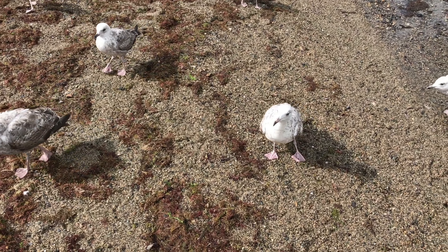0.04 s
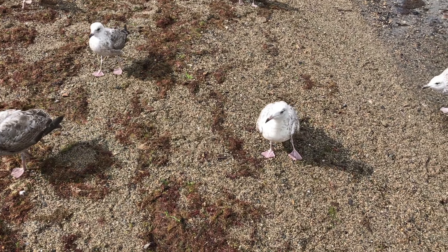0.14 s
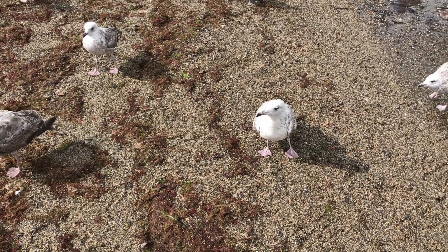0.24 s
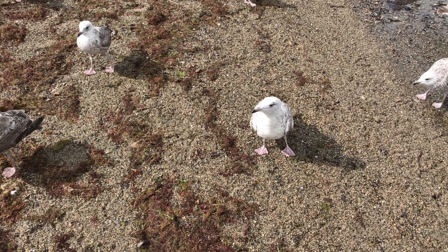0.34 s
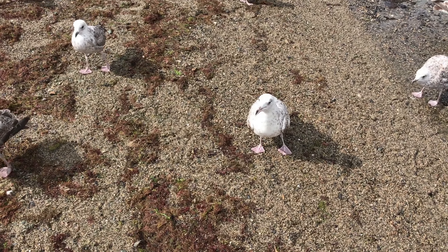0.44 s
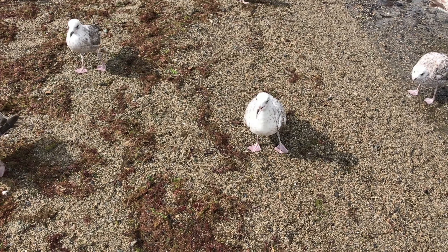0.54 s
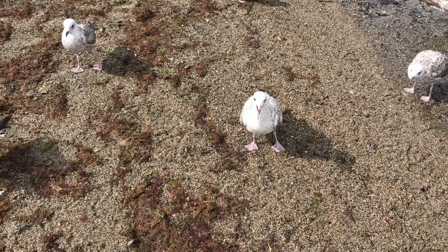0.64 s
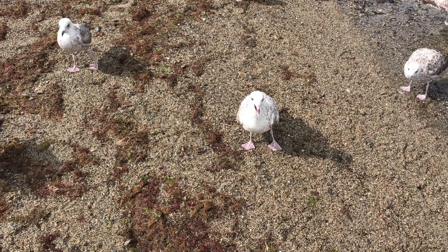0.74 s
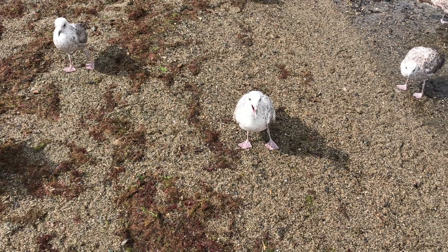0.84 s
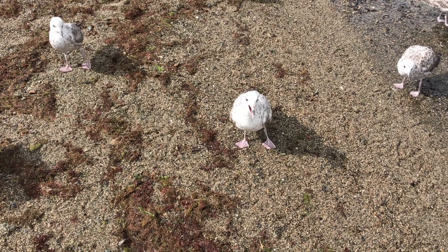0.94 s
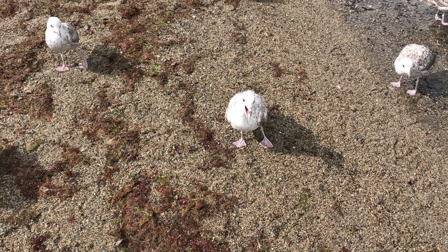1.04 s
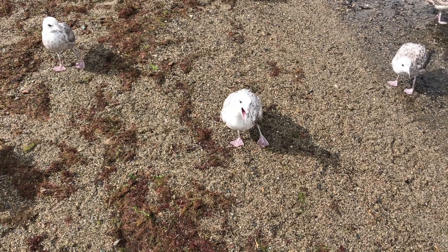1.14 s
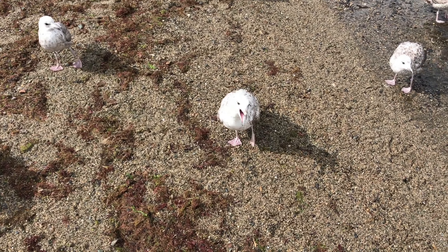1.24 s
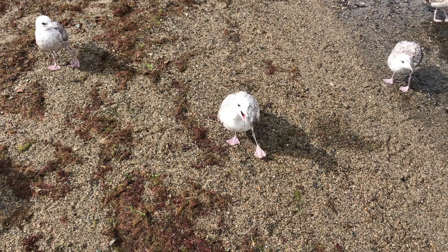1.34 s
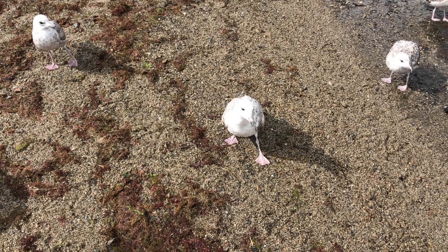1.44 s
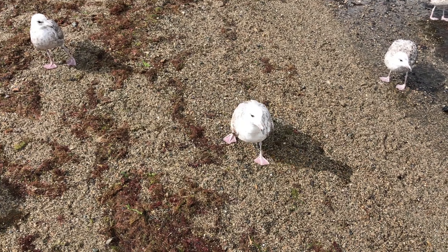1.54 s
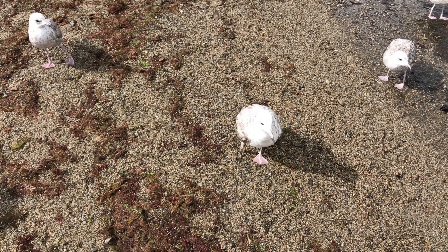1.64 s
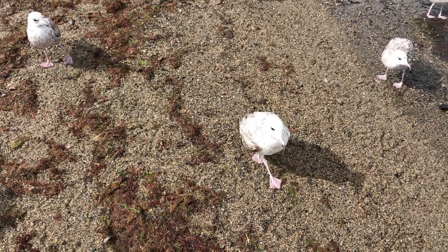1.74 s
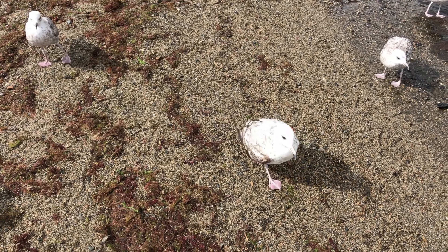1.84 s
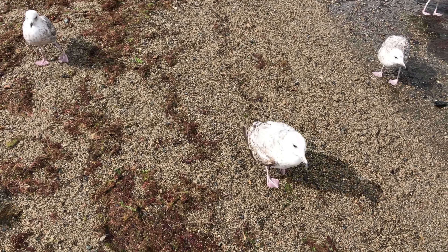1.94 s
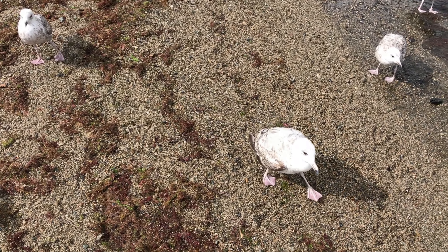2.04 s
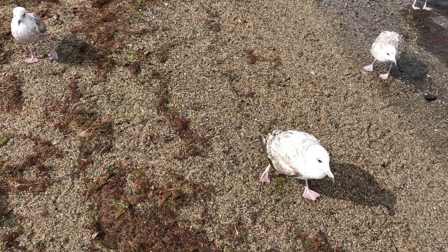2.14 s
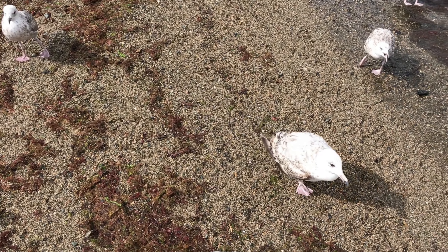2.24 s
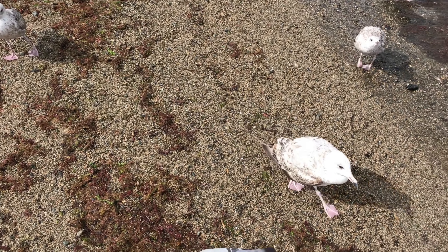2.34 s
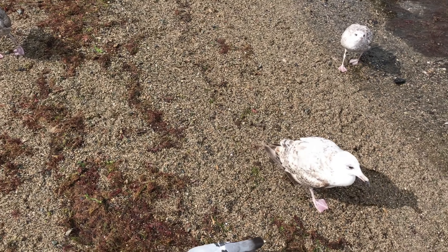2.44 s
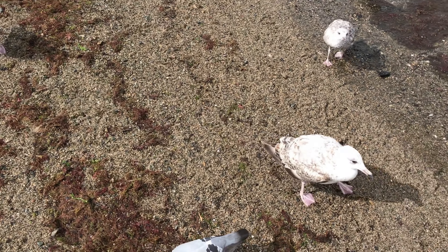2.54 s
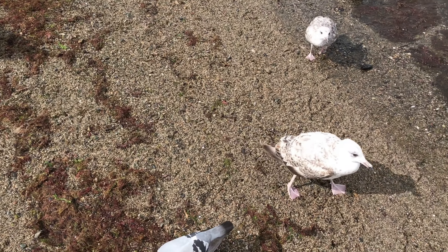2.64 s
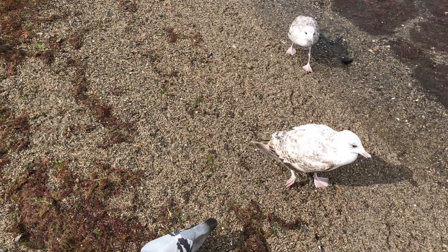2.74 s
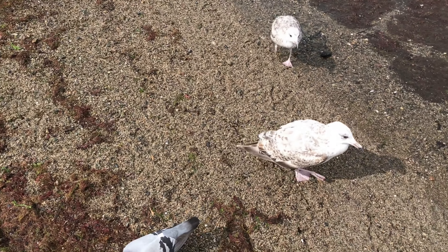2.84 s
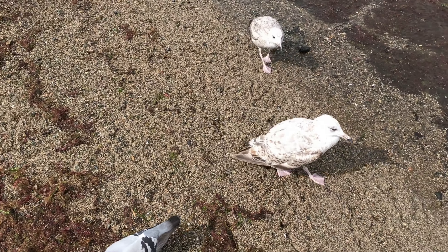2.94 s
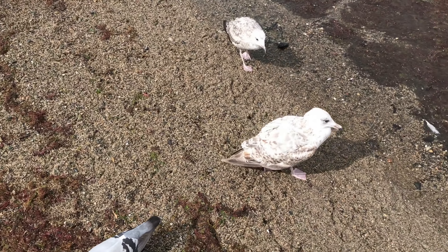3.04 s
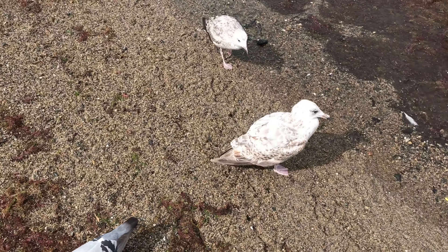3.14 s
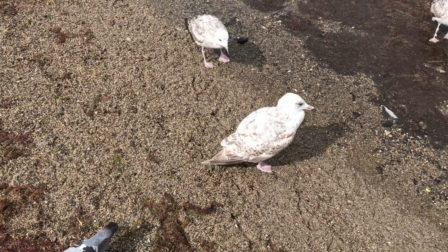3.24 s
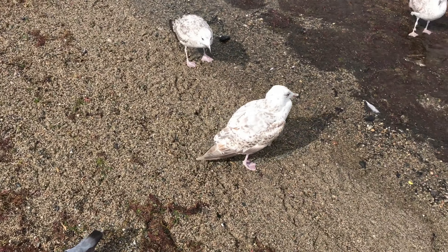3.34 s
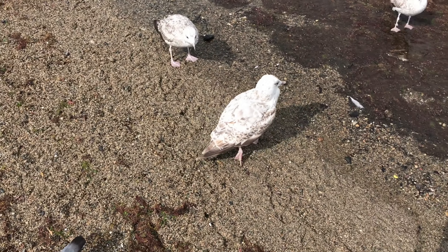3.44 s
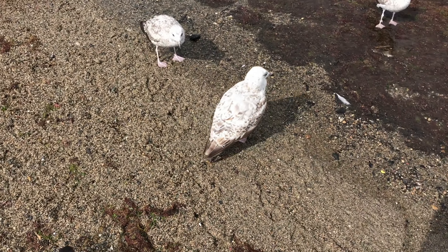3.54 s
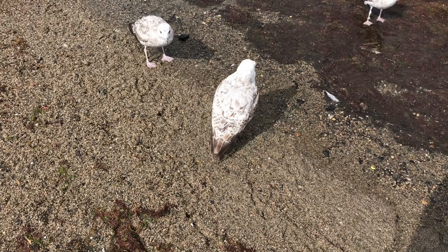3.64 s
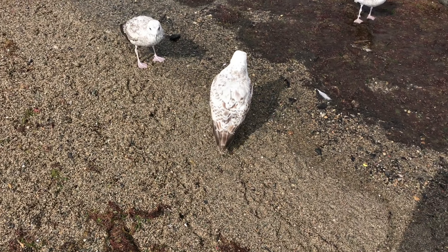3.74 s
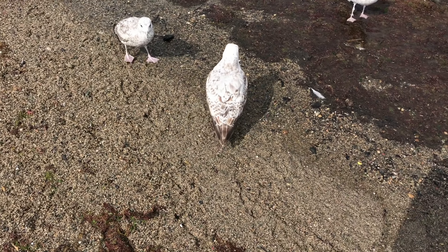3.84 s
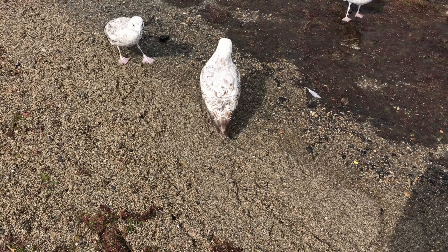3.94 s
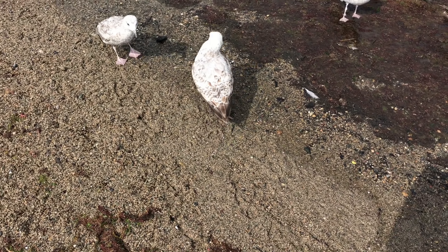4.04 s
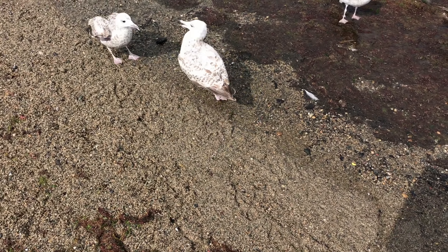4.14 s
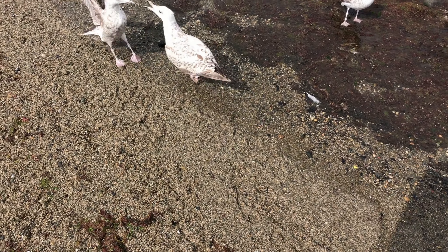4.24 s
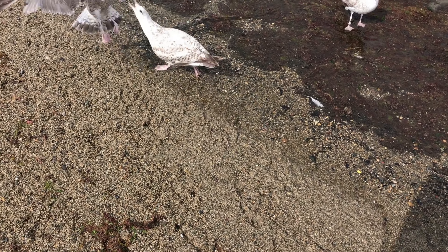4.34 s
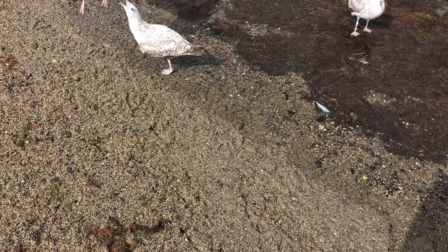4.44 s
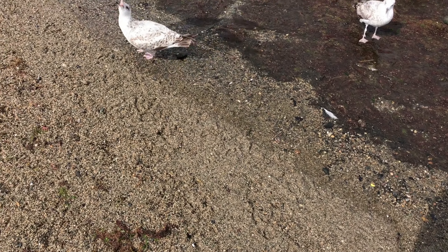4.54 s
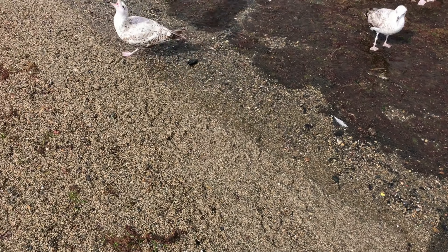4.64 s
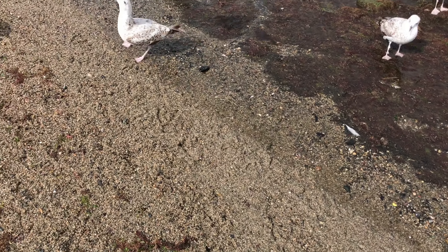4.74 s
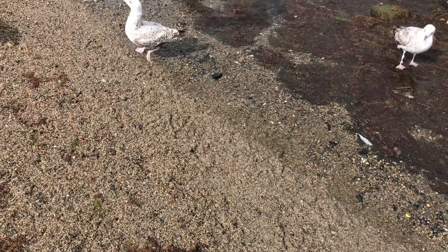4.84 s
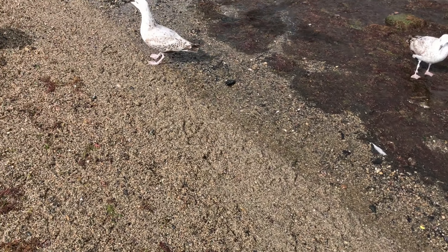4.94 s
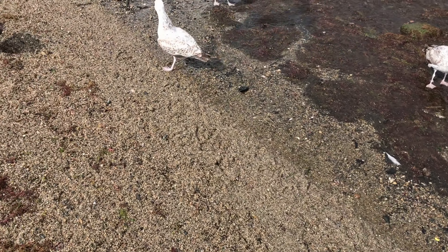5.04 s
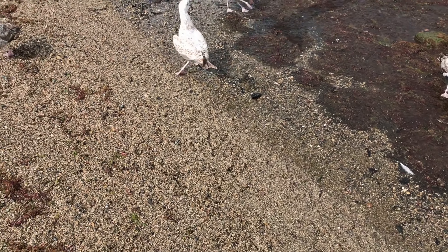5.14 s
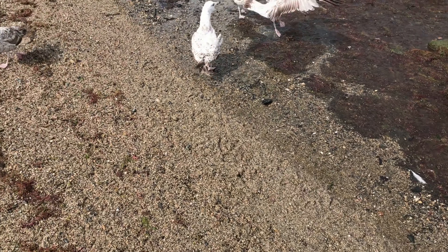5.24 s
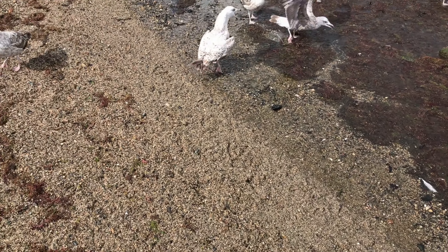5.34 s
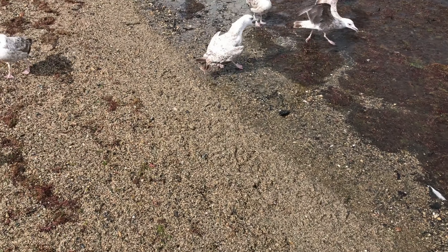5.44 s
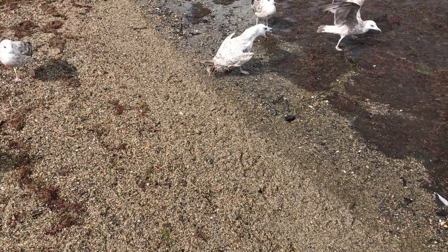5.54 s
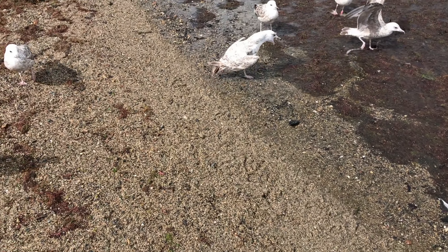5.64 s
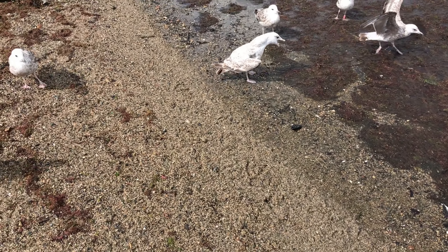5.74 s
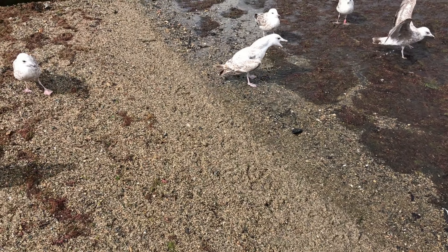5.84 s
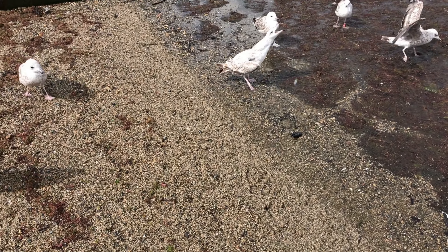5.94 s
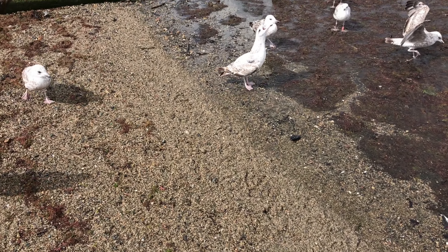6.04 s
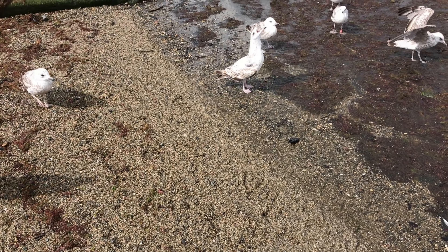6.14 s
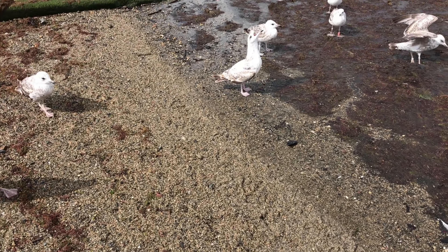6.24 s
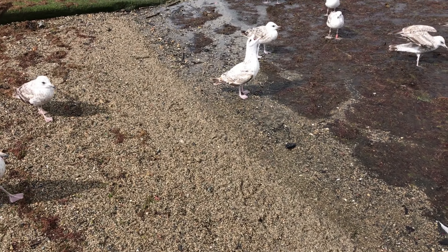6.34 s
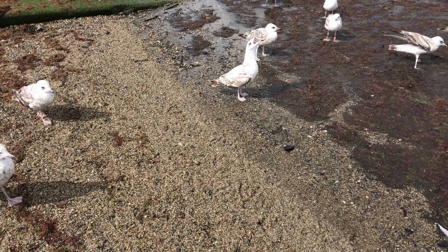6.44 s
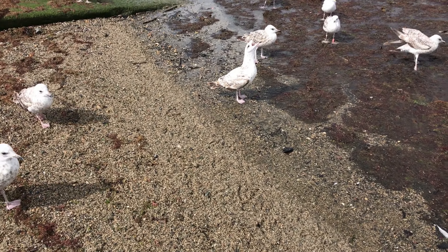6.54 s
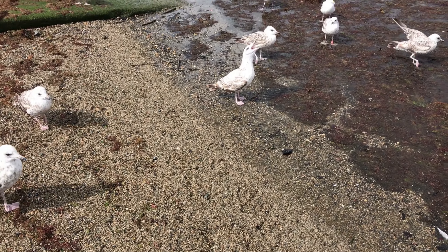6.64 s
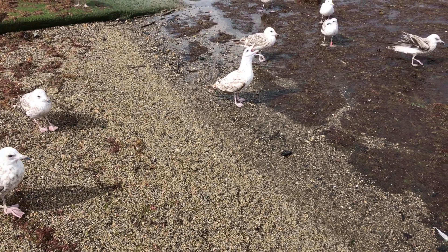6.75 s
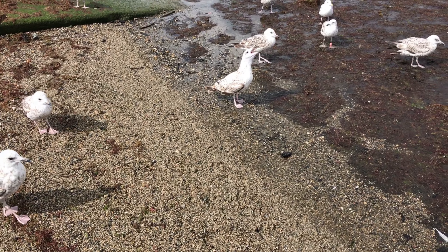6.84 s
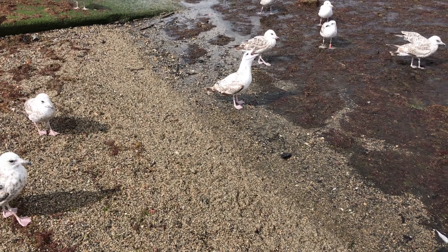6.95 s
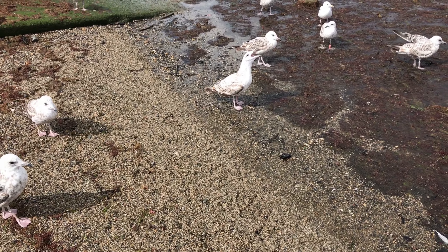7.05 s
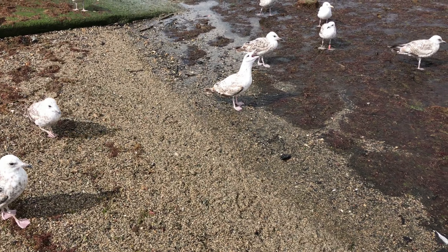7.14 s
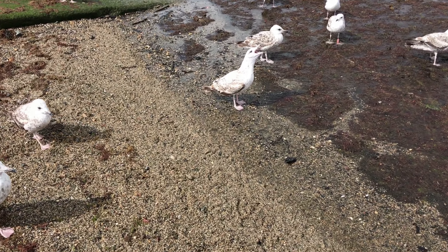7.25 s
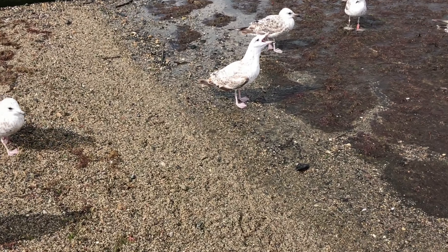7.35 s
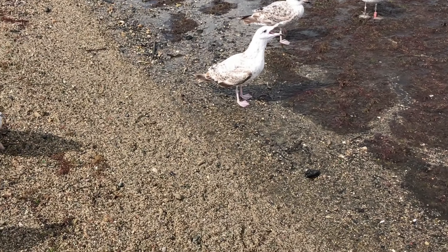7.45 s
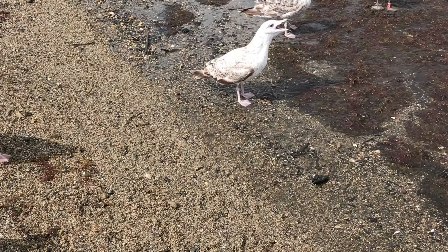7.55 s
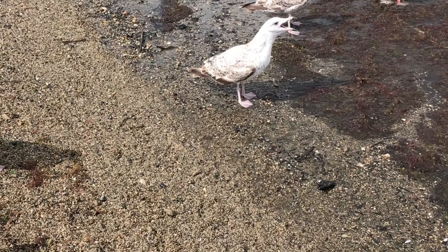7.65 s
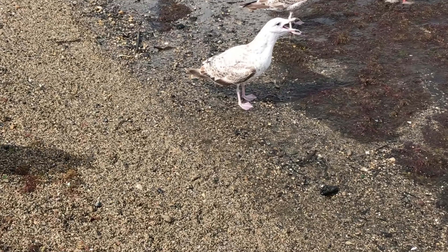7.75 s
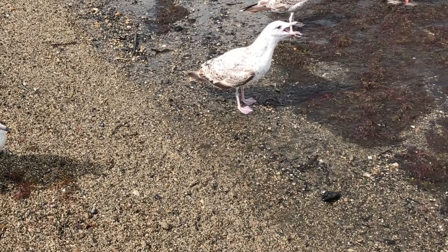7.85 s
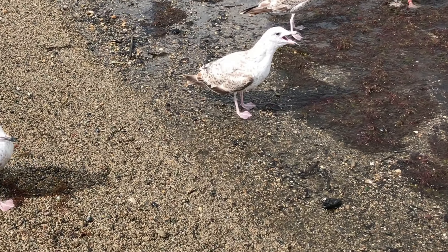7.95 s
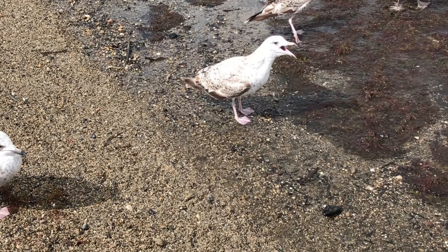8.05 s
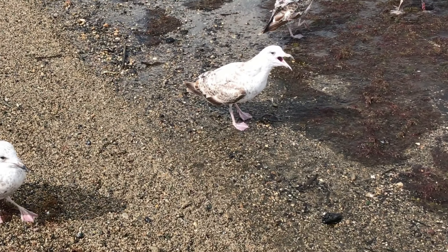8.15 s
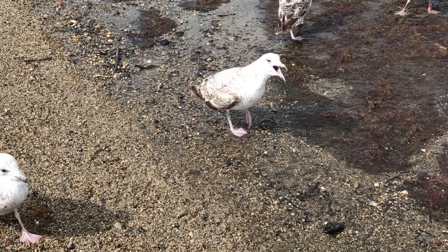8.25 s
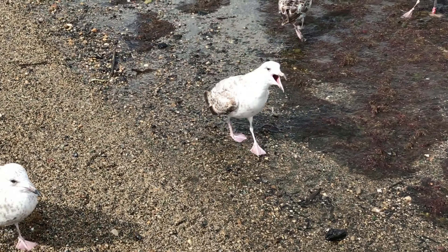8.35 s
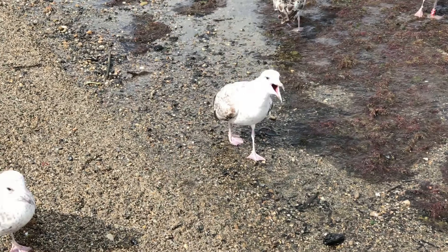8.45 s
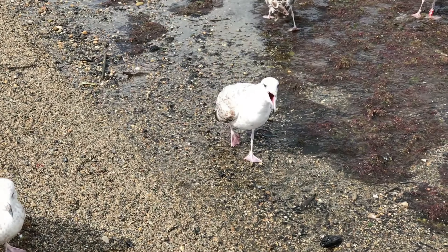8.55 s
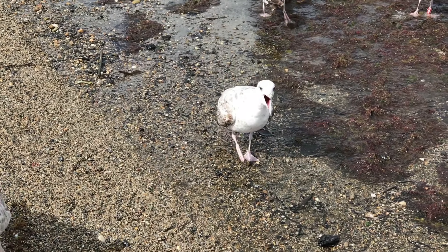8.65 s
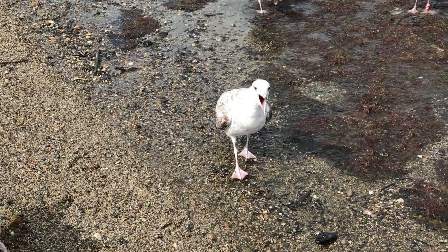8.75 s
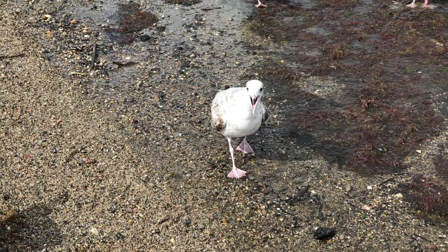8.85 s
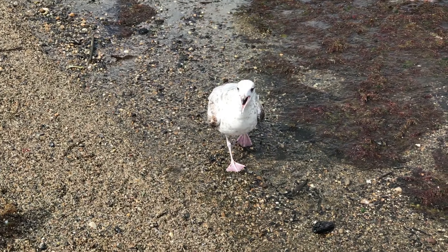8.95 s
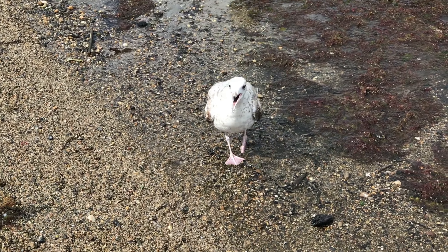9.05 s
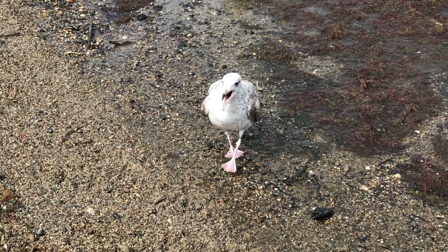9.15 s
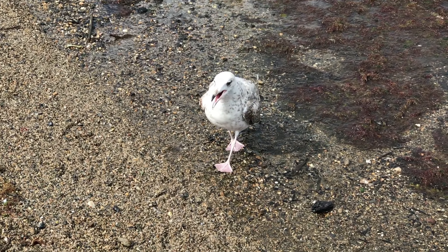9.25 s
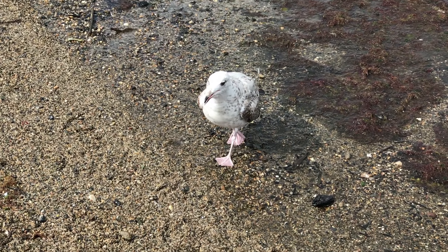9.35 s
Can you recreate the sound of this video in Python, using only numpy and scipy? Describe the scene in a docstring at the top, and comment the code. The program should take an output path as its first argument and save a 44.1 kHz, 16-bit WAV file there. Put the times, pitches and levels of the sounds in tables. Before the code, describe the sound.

Outdoors on a gravel shore, young gulls beg close by. A soft, thin wail swells into a fuller note, then shrill, wavering squeals come in two bouts with a gap between. Broken squawks and chirps lead into a regular run of sharp, two-part yelps, each snapping high and dropping hoarsely. Short rattling growls come between. Light wind bumps the microphone over faint uneven shore hiss.

```python
"""Young gulls begging on a gravel shore

A wail, two squeals, then a run of yelps built alike, with low growls between. The voices jump between registers:
thin whistles are nearly pure tones, squawks are stacks of overtones that break into half pitch,
croaks add chopped breath noise, squeals are combs of lines from two oscillations, and growls are rattled combs.
A light breeze buffets the microphone as lumpy low noise; the shore hisses unevenly and returns a faint echo."""
import sys
import numpy as np
from scipy import signal
from scipy.fft import rfft, irfft, next_fast_len
from scipy.io import wavfile
from scipy.ndimage import map_coordinates

SR = 44100
rng = np.random.default_rng(int(sys.argv[2]) if len(sys.argv) > 2 else 0)


def to_wav(sig):
    """Store sig (one row per channel, or 1-D mono) as 16-bit WAV at the path in sys.argv[1].

    Samples outside -1..1 are clipped; the rate is SR.
    """
    pcm = np.clip(np.atleast_2d(sig), -1, 1) * 32767
    pcm = np.round(pcm).astype(np.int16)
    wavfile.write(sys.argv[1], SR, pcm.T)  # frames by channels


N = 414099  # length in samples
TOP_HZ = 15830  # nothing sounds above this
MULTIPLES = np.arange(1, 15)  # partial numbers of a voice


def amp(db):
    """Gain of a level in dB."""
    return 10 ** (np.asarray(db) / 20)


def unit(x):
    """Scaled to rms 1."""
    return x / np.sqrt(np.mean(x ** 2) + 1e-20)


def along(points, hz):
    """(frequency [Hz], value) points read on a log frequency axis."""
    f, v = np.transpose(points)
    return np.interp(np.log(hz + 1), np.log(f + 1), v)


def wobble(rate):
    """A smooth random curve with `rate` knots a second."""
    knots = rng.standard_normal(int(N * rate / SR) + 2)
    fine = np.arange(len(knots) * 8) / 8  # eight curve points per knot
    curve = map_coordinates(knots, [fine])
    return np.interp(np.arange(N) * rate / SR, fine, curve)


def beak(rate, count=len(MULTIPLES)):
    """One random level curve for each partial, as a moving beak would give."""
    return np.array([wobble(rate) for _ in range(count)])


def filtered(x, response):
    """x with each frequency scaled by response(hz)."""
    size = next_fast_len(len(x) + 8192)
    spectrum = rfft(x, size) * response(np.fft.rfftfreq(size, 1 / SR))
    return irfft(spectrum, size)[:len(x)]


def noise(spectrum):
    """Coloured noise of rms 1."""
    return unit(filtered(rng.standard_normal(N), lambda hz: amp(along(spectrum, hz))))


def sing(notes, timbre, attack, release, waver):
    """Glides from first to last pitch; the membrane keeps its phase from note to note, so joined notes flow."""
    out, cycles, was = np.zeros(N), 0, 0
    tremor = waver * (wobble(40) + wobble(200))
    for start, end, hz0, hz1, db, *rest in sorted(notes):
        rise, fall = np.minimum([attack, release], (end - start) * 0.28)  # short notes are all swell and fade
        at = np.arange(round((start - rise) * SR), round((end + fall) * SR))
        t = at / SR
        hz = np.interp(t, [start, end], [hz0, hz1]) * (1 + tremor[at])
        phase = cycles + hz0 * (start - rise - was) + np.cumsum(hz) / SR
        cycles, was = phase[-1], t[-1]
        swell = np.minimum((t - start + rise) / (2 * rise), (end + fall - t) / (2 * fall))
        envelope = np.sin(np.clip(swell, 0, 1) * np.pi / 2) ** 2
        out[at] += amp(db) * envelope * timbre(at, hz, 2 * np.pi * phase, *rest)
    return out


# resonances of the throat: (frequency [Hz], relative level [dB])
THROAT_COLOUR = [(600, -34), (1000, 5), (1200, 9.5), (1900, -3.5), (3100, 8.5), (4200, -5), (5000, -14.5),
                 (6400, -15), (9000, -26), (15000, -35)]


def stack(at, hz, phase, multiples, beak_db, throat=THROAT_COLOUR):
    """Partials weighted by the throat at their frequency; the moving beak swells each in its own way."""
    partial_hz = np.minimum(multiples[:, None] * hz, SR / 2)
    gain = amp(along(throat, partial_hz)) * (partial_hz < TOP_HZ)
    waves = np.sin(multiples[:, None] * phase + multiples[:, None] ** 2)  # staggered, so the cycles are not spikes
    loudness = np.sqrt(np.mean(np.sum(gain ** 2, axis=0)) / 2)
    return np.sum(gain * amp(beak_db) * waves, axis=0) / loudness


def rasp():
    """Breath noise in the throat resonances."""
    return noise(THROAT_COLOUR)


# breeze and hiss: (time [s], breeze level [dB], hiss level before a shared 12 dB boost [dB])
AIR_LEVELS = [(.2, -51.5, -68.5), (.9, -46, -63.5), (1.8, -53.5, -67.5), (2.9, -53.5, -65.5),
              (3.401, -48, -67), (4.199, -50, -63.5), (4.999, -58, -62.5), (5.5, -46.5, -60.5),
              (6, -51, -66), (7.4, -59, -66), (8.8, -52, -66)]
# colour of the wind buffeting: (frequency [Hz], relative level per Hz [dB])
BREEZE_COLOUR = [(20, -13), (52, 4.5), (300, -7), (700, -33.5), (16000, -78.5)]
# colour of the shore hiss: (frequency [Hz], relative level per Hz [dB])
SHORE_COLOUR = [(300, 25.5), (1300, 19.5), (3000, 10), (8000, -1.5), (16000, -3.5)]


def air():
    """Low noise buffets in lumps; the hiss adds steady noise to short, bright, flickering bursts."""
    s, breeze_db, hiss_db = np.transpose(AIR_LEVELS)
    t = np.arange(N) / SR
    lumpy = unit(noise(BREEZE_COLOUR) * amp(5.4 * wobble(13)))
    breeze = amp(np.interp(t, s, breeze_db)) * lumpy
    flicker = amp(5 * wobble(40))
    bright = filtered(noise(SHORE_COLOUR), lambda hz: hz / (hz + 4000))
    hiss = 0.53 * noise(SHORE_COLOUR) + 1.39 * flicker * bright
    return breeze + amp(np.interp(t, s, hiss_db) + 12.0) * hiss


# colour of a growl: (frequency [Hz], relative level before the growl's sharpness scales it [dB])
GULLET_COLOUR = [(500, -22), (950, -3), (1700, -13), (2300, -3), (3000, 5), (3700, -5), (4700, -9),
                 (12000, -30)]
# low growls: (start [s], end [s], first pitch [Hz], last pitch [Hz], level [dB],
# level of odd partials [dB], sharpness of the gullet [factor])
GROWL_NOTES = [(.425, .472, 342.4, 329, -41, 0, 1.6), (.99, 1.16, 294.2, 287.6, -34, -11, 1.1),
               (5.36, 5.55, 313, 292.6, -40.5, -5.5, 0.94), (6.13, 6.225, 312.2, 324, -39, -5, 0.83),
               (7.58, 7.67, 310, 280, -42, -3, .7), (9.255, 9.3, 355, 340, -33, -7, 1.1)]


def growls():
    """A dense comb of partials, odd ones often weaker, beaten by an uneven membrane rattle over a little breath."""
    multiples = np.arange(1, 31)
    flare_db = 4.5 * beak(45, count=30)
    breath, jitter = noise(GULLET_COLOUR), .03 * wobble(400)
    rattle_hz = 165 + 45 * wobble(40)
    rattle = 1 + .55 * np.cos(2 * np.pi * np.cumsum(rattle_hz) / SR)

    def timbre(at, hz, phase, odd_db, sharpness):
        beak_db = flare_db[:, at] + odd_db * (multiples[:, None] % 2)
        gullet = [(f, sharpness * db) for f, db in GULLET_COLOUR]
        comb = stack(at, hz, phase + jitter[at], multiples, beak_db, gullet)
        return (comb + amp(-20) * breath[at]) * rattle[at]
    return sing(GROWL_NOTES, timbre, attack=.016, release=.006, waver=.005)


def shore_echo(x):
    """Open ground returns a faint, short, scattered echo."""
    t = np.arange(SR // 2) / SR
    tail = rng.standard_normal(len(t)) * amp(-60 * t / 0.18)  # dies by 60 dB in 0.18 s
    return amp(-22.5) * signal.fftconvolve(x, tail / np.linalg.norm(tail))[:N]


# single full-voiced notes: (start [s], end [s], first pitch [Hz], last pitch [Hz], level [dB],
# half-pitch level [dB], rasp level [dB], lift of the second partial, if any [dB])
SQUAWK_NOTES = [(0.49, 0.8, 1673, 1746, -46, -14, -28, 8), (0.8, 0.99, 1745, 1819, -43, -16, -20, 8),
                (1.16, 1.28, 1070, 1096, -32, -25, -48), (1.28, 1.475, 1078, 1015, -30, -21, -25),
                (4.875, 5.1, 1353, 1320, -46.5, 2, -10.5), (5.195, 5.237, 2050, 1943, -28, -33, -18),
                (6.2, 6.34, 1525, 1415, -41, 1.5, -3), (7.01, 7.06, 2205, 1900, -35.5, -10, -9.5),
                (5.692, 5.74, 2030, 1850, -30, -20, -9)]


def squawks(notes):
    """Harmonic stack; alternating cycles add partials halfway; breath rasps, shakes and breaks the partials."""
    breath = unit(rasp() * amp(3 * wobble(200)))
    whole_beak, halves_beak, ragged = beak(35), beak(45), beak(120)
    shake = .15 * wobble(500)

    def timbre(at, hz, phase, half_db, rasp_db, bright_db=0):
        loose = min(1, .09 * SR / len(at))  # long notes are held steadier
        tearing = amp(rasp_db) * np.linspace(.4, 1.6, len(at))  # the voice tears more as the note runs out
        from_edge = np.minimum(at - at[0], 2 * (at[-1] - at))
        settled = np.clip(from_edge / (0.028 * SR), 0, 1) ** 3  # the alternation sets in late and dies early
        phase = phase + (.25 * loose + tearing) * shake[at]
        break_depth_db = np.minimum(12 * tearing + loose * MULTIPLES[:, None], 6)
        broken_db = -break_depth_db * ragged[:, at] ** 2 + bright_db * (MULTIPLES[:, None] == 2)
        whole = stack(at, hz, phase, MULTIPLES, 3 * loose * whole_beak[:, at] + broken_db)
        halves = stack(at, hz, phase, MULTIPLES - .5, 4.5 * halves_beak[:, at] + broken_db)
        return whole + settled * amp(half_db) * halves + tearing * breath[at]
    return sing(notes, timbre, attack=0.0062, release=0.0079, waver=0.0036)


# single thin, nearly pure notes: (start [s], end [s], first pitch [Hz], last pitch [Hz], level [dB])
WHISTLE_NOTES = [(0.995, 1.16, 1060, 1085, -41.5), (5.22, 5.245, 2493, 2610, -33.5),
                 (5.28, 5.296, 2640, 2800, -39.5), (5.316, 5.355, 2680, 2450, -39),
                 (5.4, 5.42, 1350, 1510, -30), (5.487, 5.523, 1380, 1412, -27),
                 (5.52, 5.605, 3630, 3680, -47.5), (5.686, 5.696, 3000, 2700, -29),
                 (6.2, 6.36, 1544, 1416, -33.5), (7.491, 7.522, 3100, 3234, -20.5)]


def whistles(notes):
    """A nearly sinusoidal membrane with a faint overtone; the higher it is forced, the hoarser it gets."""
    shake, flutter, overtone_db = wobble(1000), wobble(45), 4 * wobble(30)

    def timbre(at, hz, phase, fade_db=0):
        strain = np.clip((hz - 2800) / 1200, .08, 1)
        phase = phase + .28 * strain * shake[at]
        tone = np.sin(phase) + amp(-20.0 + overtone_db[at]) * np.sin(2 * phase)
        level_db = 2.2 * flutter[at] - np.linspace(0, fade_db, len(at))
        return np.sqrt(2) * tone * amp(level_db)
    return sing(notes, timbre, attack=.0045, release=0.0061, waver=0.00299)


# single hoarse notes: (start [s], end [s], first pitch [Hz], last pitch [Hz], level [dB])
CROAK_NOTES = [(1.475, 1.505, 1737, 1554, -45), (4.525, 4.55, 1243, 1560, -36),
               (4.835, 4.855, 1352.0, 1458, -36.5), (5.23, 5.25, 1082, 1102, -34.5),
               (5.432, 5.462, 3000, 2680, -30.5), (5.472, 5.525, 2900, 2800, -35.5)]


def croaks(notes):
    """An unsteady half-pitch stack and breath noise, both chopped by irregular closures of the membrane."""
    breath = rasp()
    # odd partials of the half pitch are weaker, and each higher partial loses a little more
    beak_db = 5 * beak(60) - 6 * (MULTIPLES[:, None] % 2) - .6 * MULTIPLES[:, None]
    jitter = .1 * wobble(500)
    closures = amp(2.5 * wobble(400) + 2 * wobble(40))

    def timbre(at, hz, phase):
        voice = stack(at, hz / 2, phase / 2 + jitter[at], MULTIPLES, beak_db[:, at])
        return (voice + amp(-10) * breath[at]) * closures[at]
    return sing(notes, timbre, attack=0.0009, release=0.0091, waver=0.011)


# each squeal as points to glide through: (time [s], lowest line [Hz], step between lines [Hz],
# loudest line [0-3, may lie between], level [dB])
SQUEAL_PATHS = [
    [(2.25, 3060, 2960, 0.91, -31.5), (2.281, 2870, 2950, 0.6, -33)],
    [(2.281, 2950, 479, 2.1, -21.5), (2.305, 2890, 476, 1.97, -30), (2.318, 2940, 643, 1.13, -37.5),
     (2.345, 2980, 507, 2.2, -35), (2.365, 3230, 670, 2.9, -30), (2.39, 4060, 800, 2, -40),
     (2.582, 3630, 750, 1.76, -37.5), (2.592, 3500, 573, 1.85, -42), (2.65, 3346, 620, 2.1, -33),
     (2.748, 3280, 630, 1.76, -29), (2.762, 3290, 644, 1, -34.5), (2.828, 3240, 480, 0.052, -37.5),
     (2.85, 3170, 477, 0.42, -44)],
    [(4.535, 3560, 698, 1.14, -36.5), (4.56, 3560, 940, 0.74, -21.5), (4.6, 3076, 1160, 1.17, -38.5),
     (4.655, 3190, 874, 0.94, -35.5), (4.666, 3870, 900, 2, -39.5), (4.732, 3950, 795, 2, -43.5),
     (4.738, 3580, 758, 2, -36.5), (4.795, 3557, 667, 1, -33.5), (4.845, 3540, 724, 1, -28),
     (4.856, 3580, 752, 2.2, -34), (4.89, 3530, 724, 1.8, -41.5), (4.93, 3670, 740, 1.6, -27),
     (4.97, 3740, 686, 1.74, -40.5), (5, 3600, 686, 0.94, -34.5), (5.06, 3500, 604, 0.74, -39.5),
     (5.105, 3310, 616, 0.2, -22.5), (5.125, 3260, 621, 0.18, -49), (5.15, 3375, 329, 1, -37.5),
     (5.198, 3330, 636, 0.091, -24.5), (5.225, 3300, 710, 0.18, -41)],
]
ABOVE_DB, BELOW_DB = 30, 13  # loss for each line above the loudest; loss of the lowest line, more for those between
STRAIN_HZ, LEAP_HZ_PER_S = 5280, 40000  # above this the loudest line beats; a glide this fast tears


def squeals():
    """A high oscillation mixed with a slow one sounds as a comb of lines; the loudest wanders among them.
    Weak lines are hoarse and drop out, leaps tear the voice. Sums of two or three lines sound higher up."""
    out, overtones, lines = np.zeros(N), np.zeros(N), np.arange(4)[:, None]
    low_waver, step_waver = .004 * wobble(110), .015 * wobble(130)
    flutter, shake = beak(55, count=4), beak(600, count=4)
    haze = noise([(2000, -20), (4300, 0), (15000, -13)]) * amp(3 * wobble(60))
    beads = np.cos(2 * np.pi * np.cumsum(135 + 20 * wobble(30)) / SR)  # the beating of a strained voice
    for rows in SQUEAL_PATHS:
        s, *cols = np.transpose(rows)
        at = np.arange(round(s[0] * SR), round(s[-1] * SR))
        low_hz, step_hz, loudest, db = [np.interp(at / SR, s, c) for c in cols]
        wavering_hz = [low_hz * (1 + low_waver[at]), step_hz * (1 + step_waver[at])]
        low, step = np.cumsum(wavering_hz, axis=1) * 2 * np.pi / SR
        above_db = ABOVE_DB * (lines - loudest)
        below_db = BELOW_DB * (1 + lines / 2) * np.minimum(loudest - lines, 1)
        loss_db = np.where(lines > loudest, above_db, below_db)
        strain = np.clip((low_hz + loudest * step_hz - STRAIN_HZ) / 200, 0, 1)
        glide_hz_per_s = np.abs(np.gradient(low_hz + step_hz)) * SR
        leap = np.clip(glide_hz_per_s / LEAP_HZ_PER_S, 0, 1) ** 2
        rough = shake[:, at] * (.08 + .01 * loss_db + .5 * leap)
        line_db = (2.3 + .25 * np.minimum(loss_db, 16)) * flutter[:, at] - loss_db
        comb = np.sum(amp(line_db) * np.exp(1j * (low + lines * step + rough)), axis=0)
        comb = comb * (1 + .7 * strain * beads[at])
        edges = np.clip(np.minimum(at - at[0], at[-1] - at) / (0.0026 * SR), 0, 1)
        gain = np.sqrt(2) * edges * amp(db)
        triple_sums = amp(-30) * comb * comb ** 2
        out[at] += gain * (np.imag(comb + triple_sums) + amp(-21) * haze[at])
        overtones[at] += gain * np.imag(amp(-15.5) * comb ** 2)  # sums of two lines
    return out + filtered(overtones, lambda hz: 1 / (1 + (hz / 9500) ** 8))


# yelps that climb as a whistle and snap: (start [s], drop [s], whistle [Hz], snap [Hz], opening level [dB],
# pip level [dB], climb level [dB], snap level [dB], drop level [dB], half-pitch level in the drop [dB],
# clear tail level [dB], hoarse tail level [dB])
CLIMBING_YELPS = [(5.848, 6.058, 2724, 2655, -34.5, -29.5, -48.5, -23, -28, -4.5, -43, -38),
                  (6.168, 6.34, 2600, 2818, -35, -36, -43.5, -22.5, -24.5, -13, -53, -59),
                  (6.473, 6.644, 2680, 2950, -37, -31.5, -34, -20.5, -24, -8, -48, -59),
                  (6.774, 6.935, 2750, 3020, -35.5, -33.5, -37, -15.5, -23.5, 1, -41, -55.5),
                  (7.073, 7.233, 2752, 3053, -33, -39, -36, -17, -23.5, -2, -43, -30.5)]
# yelps that hold a level note and crest: (start [s], crest [s], drop [s], held pitch [Hz], crest pitch [Hz],
# drop pitch [Hz], opening level [dB], held level [dB], half-pitch level while held [dB], crest level [dB],
# drop level [dB], half-pitch level in the drop [dB], clear tail level [dB], hoarse tail level [dB],
# lift of the second partial [dB])
HELD_YELPS = [(7.376, 7.521, 7.536, 2273, 3075, 2078, -34.5, -49, 0, -18.5, -23, -1.5, -53, -31, 0),
              (7.69, 7.8, 7.842, 2386, 3210, 2127, -32.5, -42.5, -32, -20, -25.5, -9, -22.5, -49, 0),
              (8.025, 8.139, 8.172, 2375, 3270, 2176, -31, -36, -13, -18, -25.5, -2.5, -39, -32, 2.5),
              (8.348, 8.464, 8.495, 2370, 3266, 2176, -29.5, -35, 1.5, -22, -24, -13, -23, -31.5, 2.5),
              (8.677, 8.797, 8.822, 2357, 3308, 2176, -31, -32.5, 5, -20.5, -23.5, -5, -25, -32, 2.5),
              (9.1, 9.232, 9.235, 2365, 3284, 2300, -35, -31, -1, -33, -28, -4, -44, -27, 9)]
# names in _S are seconds; PITCH is relative to the drop; SAG, RISE and CLIMB are pitch ratios within a note
OPENING_S, OPENING_PITCH, OPENING_RISE = 0.028, .59, 1.21  # the croak that starts a yelp
PIP_AFTER_S, SECOND_AFTER_S = .04, .075  # the two swells of the middle, after the start
PIP_S, PIP_SAG, FLAT_SHARE, CLIMB = .015, 0.93, 0.45, 1.13  # the whistle lies flat for a share, then climbs
LEAP_S, LEAP_HZ, LEAP_DB, SNAP_S, SNAP_SAG = 0.027, 3676, -13.5, 0.008, .9  # a higher note leads into the snap
HELD_GAP_S, HELD_SAG, HELD_RASP_DB, CREST_SAG = 0.00824, 0.96, -22.5, 0.95
DROP_S, DROP_SAG, DROP_RASP_DB, CLIMBING_DROP_HZ = 0.035, .93, -13, 2021
TAIL_AFTER_S, TAIL_S, TAIL_PITCH, TAIL_SAG = .034, .022, .56, .92  # the tail sits near half the drop's pitch
TAIL_FADE_DB = 6  # lost from start to end of the clear tail


def yelps():
    """Lists whistled, squawked and croaked notes of every yelp: opening croak, middle, peak, drop, tail."""
    thin, full, hoarse = [], [], []

    def frame(start, drop, hz, opening_db, drop_db, half_db, clear_db, hoarse_db, bright_db=0):
        """The opening, drop and tail that all yelps share."""
        opening_hz, tail_hz, tail_start = OPENING_PITCH * hz, TAIL_PITCH * hz, drop + TAIL_AFTER_S
        tail = (tail_start, tail_start + TAIL_S, tail_hz, TAIL_SAG * tail_hz)
        hoarse.append((start, start + OPENING_S, opening_hz, OPENING_RISE * opening_hz, opening_db))
        hoarse.append((*tail, hoarse_db))
        full.append((drop, drop + DROP_S, hz, DROP_SAG * hz, drop_db, half_db, DROP_RASP_DB, bright_db))
        thin.append((*tail, clear_db, TAIL_FADE_DB))

    for start, drop, hz, snap_hz, opening_db, pip_db, climb_db, snap_db, *ending in CLIMBING_YELPS:
        frame(start, drop, CLIMBING_DROP_HZ, opening_db, *ending)
        pip, flat, snap = start + PIP_AFTER_S, start + SECOND_AFTER_S, drop - SNAP_S
        bend = flat + FLAT_SHARE * (snap - SNAP_S - flat)
        thin += [(pip, pip + PIP_S, hz / PIP_SAG, hz, pip_db),
                 (flat, bend, hz, hz, climb_db),
                 (bend, snap - SNAP_S, hz, CLIMB * hz, climb_db),
                 (snap - LEAP_S, snap, LEAP_HZ, CREST_SAG * LEAP_HZ, snap_db + LEAP_DB),
                 (snap, drop, snap_hz, SNAP_SAG * snap_hz, snap_db)]
    for row in HELD_YELPS:
        start, crest, drop, hz, crest_hz, drop_hz, opening_db, held_db, half_db, crest_db, *ending = row
        frame(start, drop, drop_hz, opening_db, *ending)
        second = start + SECOND_AFTER_S
        held_voice = (held_db, half_db, HELD_RASP_DB, ending[-1])  # last: lift of the second partial
        full += [(start + PIP_AFTER_S, second - HELD_GAP_S, hz / HELD_SAG, hz, *held_voice),
                 (second, crest, hz, hz, *held_voice)]
        thin.append((crest, drop, crest_hz, CREST_SAG * crest_hz, crest_db))
    return thin, full, hoarse


def scene():
    """Gulls, their echo and the air."""
    thin, full, hoarse = yelps()
    gulls = squeals() + whistles(WHISTLE_NOTES + thin) + squawks(SQUAWK_NOTES + full)
    gulls = gulls + croaks(CROAK_NOTES + hoarse) + growls()
    return (gulls + shore_echo(gulls) + air())[None]


def record(dry):
    """Removes everything from the band limit upward."""
    return filtered(dry[0], lambda hz: hz < TOP_HZ)[None]


dry = scene()
out = record(dry)
to_wav(out)
```